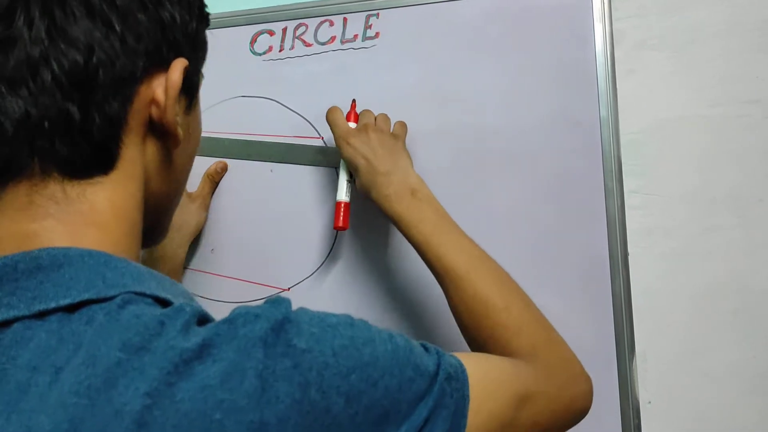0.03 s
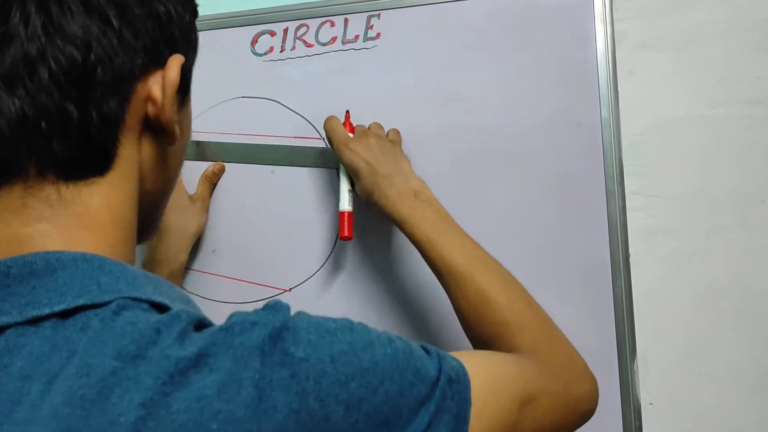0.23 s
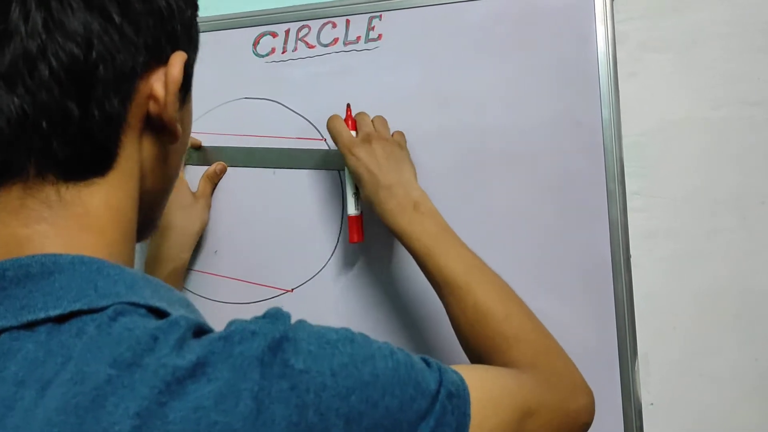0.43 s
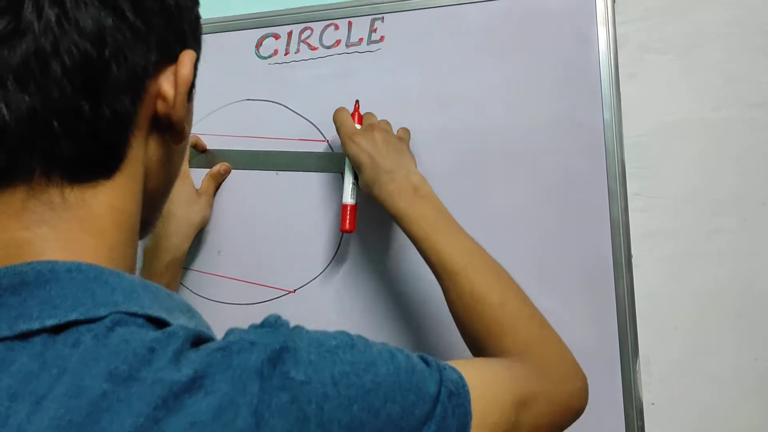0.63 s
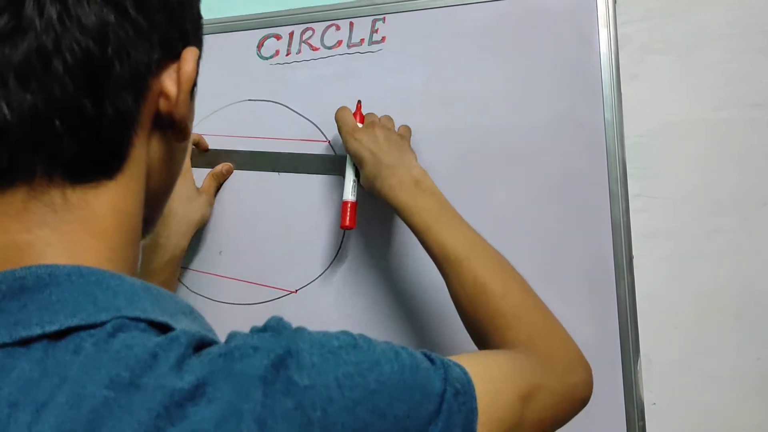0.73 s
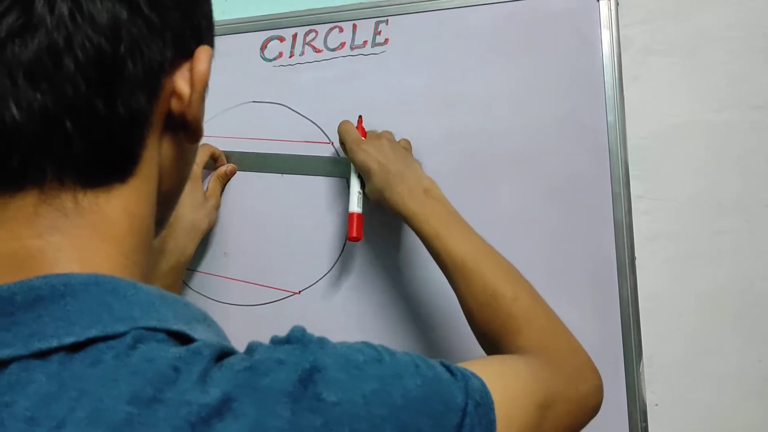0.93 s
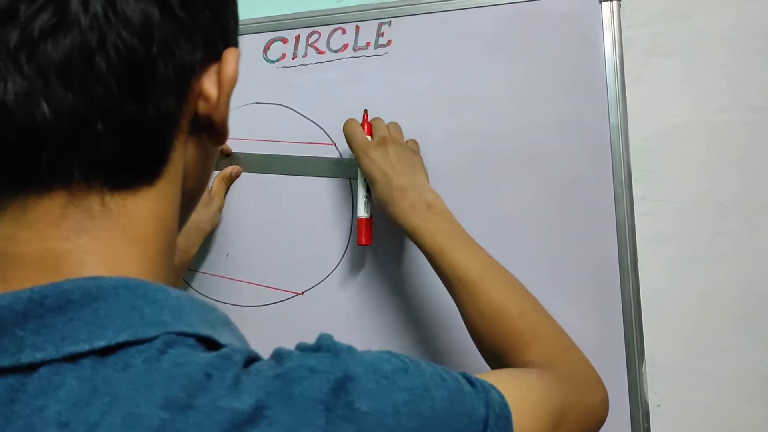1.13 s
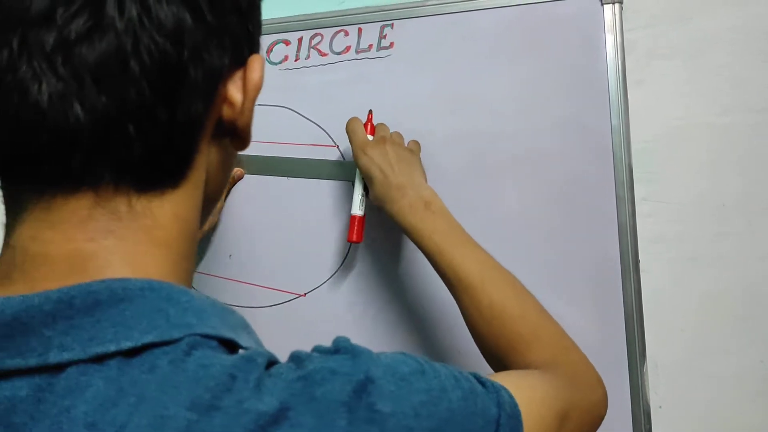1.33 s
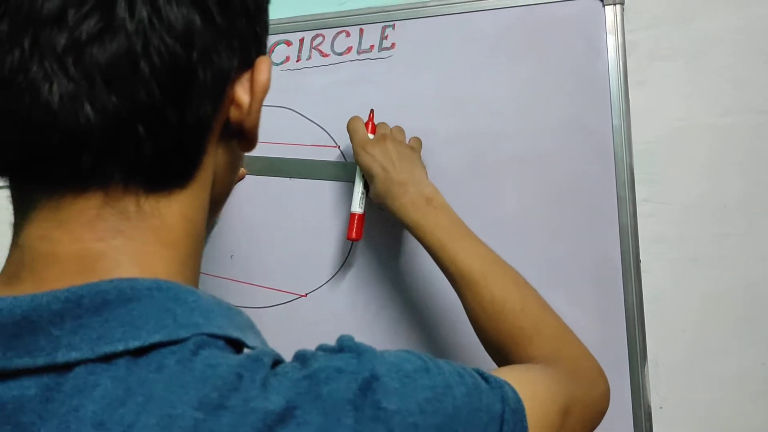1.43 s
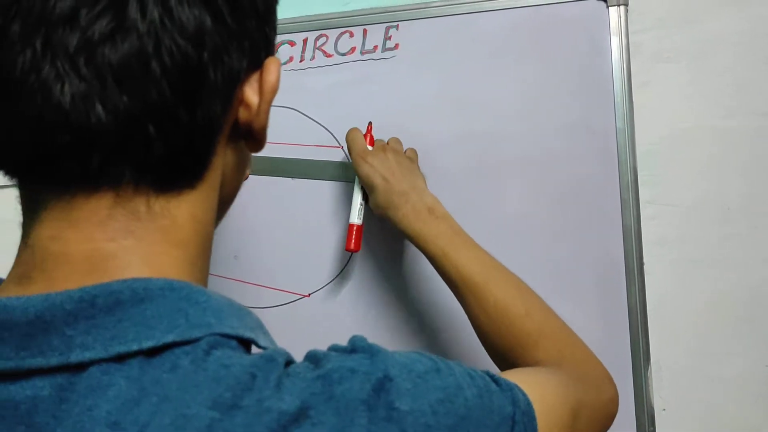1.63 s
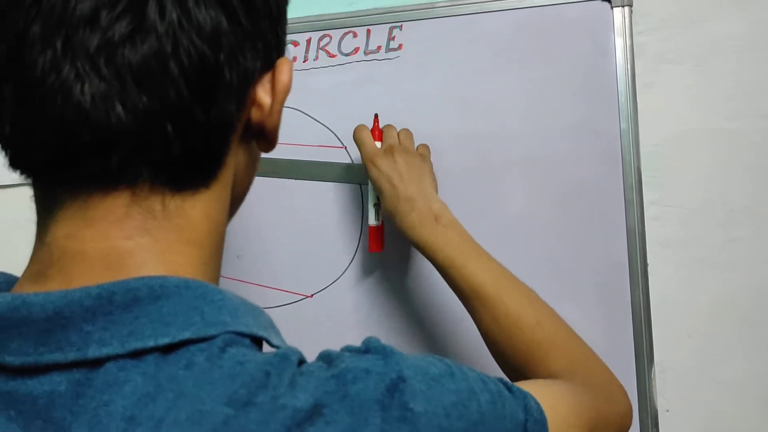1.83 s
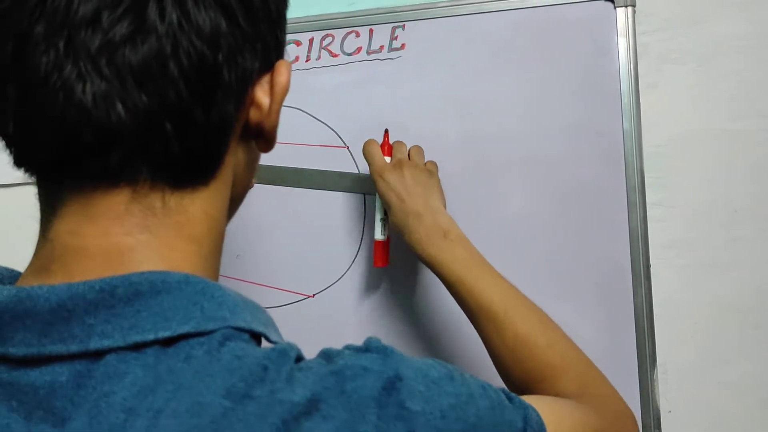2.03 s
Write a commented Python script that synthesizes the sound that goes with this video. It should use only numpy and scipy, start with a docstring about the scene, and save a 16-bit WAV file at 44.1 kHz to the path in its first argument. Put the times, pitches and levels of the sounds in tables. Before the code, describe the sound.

A ruler slips briefly and clicks against a hanging whiteboard at about 0.25 seconds, making a sharp, hollow knock. Faint taps follow, then a second, slightly softer knock comes at 0.9 seconds. Fingers and a marker add light ticks and small rubs from 1 second until about 2.1 seconds. The small room gives a short echo, with a low rumble and hiss underneath.

```python
"""A small, quiet room: a ruler and a marker are shifted on a hanging whiteboard.
Twice the ruler slides, clicks down and knocks the board, which flexes and rings low and hollow;
fingers and marker add faint taps and rubs. The walls answer briefly over a low rumble and hiss."""
import sys
import numpy as np
from scipy import signal
from scipy.fft import rfft, irfft
from scipy.io import wavfile

SR = 44100
rng = np.random.default_rng(int(sys.argv[2]) if len(sys.argv) > 2 else 0)


def digitize_waveform(pressure):
    """Quantize a signal to 16-bit integers and store it at the path in sys.argv[1].

    Rows of a 2-D input are taken as channels; values are limited to [-1, 1].
    """
    field = np.atleast_2d(pressure).T
    bounded = np.clip(field, -1, 1)
    quanta = np.round(bounded * 32767).astype(np.int16)
    wavfile.write(sys.argv[1], SR, quanta)


N = 92610
T = np.arange(N) / SR
FREQS = np.maximum(np.fft.rfftfreq(N, 1 / SR), 1)

# Spectrum of the board's dense, damped modes. Each row: frequency in Hz, relative density in dB.
CLACK_SPECTRUM = [(90, -65.5), (150, -39.5), (240, -18.5), (400, -16), (750, 3), (1000, -2.5), (1330, -2),
                  (1650, -9.5), (2100, -14.5), (2800, -20.5), (5000, -31), (9000, -27.5), (15000, -71.5)]
# Spectrum of ticks and sliding hiss. Each row: frequency in Hz, relative density in dB.
CLICK_SPECTRUM = [(200, -65), (1000, -28.5), (2500, -26.5), (4000, -16), (5300, -11.5), (7000, -1),
                  (8800, -5), (10500, -10.5), (12000, -16.5), (15500, -17)]


def board_knocks():
    """Each blow flexes the board for a few cycles, rings its modes and gives a woody clack."""
    # Each row: start in seconds, flex level in dB, flex pitch in Hz, push length in seconds,
    # ring gain in dB, clack level in dB, clack tilt in dB per octave.
    blows = [(0.211, -38, 532, .012, -58, -55, 4), (.2462, -8.5, 510.4, 0.022, -19.5, -17, 1),
             (0.47, -45.5, 502, 0.0097, -52.5, -48.5, 4.5), (0.533, -47.5, 503, 0.018, -63, -62, 6),
             (0.663, -36, 523, 0.023, -58, -58, 5.5), (.773, -54, 602, 0.018, -58, -59, 4.5),
             (0.885, -35, 546, 0.019, -46.5, -45, 1), (.9113, -14.5, 601, 0.0117, -27.5, -21, -5.5),
             (.9135, -42.5, 253.4, 0.015, -51, -46, 3), (1.029, -44, 563, 0.0051, -54, -52, 4),
             (1.197, -44, 560, 0.0093, -54, -54.5, 4.5), (1.393, -40.5, 496, 0.019, -62, -69, 9),
             (1.5186, -54, 1102, 0.025, -46.5, -52, 4), (1.596, -48, 573, 0.014, -50, -49, 1.5),
             (1.635, -41, 508, 0.024, -51.5, -49.5, 0.5), (1.703, -57.5, 500, .022, -63, -63, 6),
             (1.8267, -44, 523, 0.0081, -78, -56, 2)]
    # Each row: frequency in Hz, relative level in dB, T60 in seconds.
    board_modes = [(324.6, -5.5, 0.15), (478.7, -7.5, 0.14), (523.1, -3.5, 0.25), (648.2, 10.5, 0.12),
                   (764, -10, 0.24), (874, -4.5, 0.17), (980, -52, 0.13), (1120, 3, 0.11),
                   (1374, -9.5, 0.1), (1450, -6.5, 0.099), (1985, -18, .16), (2350, -14, 0.078)]
    boost_db, boost_octaves, ring_trim_db = 7, 0.26, -4
    echo_s, echo_db = 0.017, -8
    modes = [(hz, from_db(db) * decay(t60_s) * attack(0.0065) * np.sin(2 * np.pi * hz * T))
             for hz, db, t60_s in board_modes]
    clack_envelope = attack(0.0021) * decay(t60_s=0.12)
    noise = stereo_noise()
    flexes, rings, clacks = np.zeros(N), np.zeros(N), np.zeros((2, N))
    for start_s, flex_db, flex_hz, push_s, ring_db, clack_db, tilt_db in blows:
        push = np.sin(np.pi * np.minimum(T / push_s, 1)) ** 2
        flexes += from_db(flex_db) * delayed(push * np.sin(2 * np.pi * flex_hz * T), start_s)
        ring = 0
        for hz, mode in modes:   # modes near the flex pitch ring more
            nearness = np.exp(-(np.log2(hz / flex_hz) / boost_octaves) ** 2)
            ring += from_db(boost_db * nearness) * mode
        rings += from_db(ring_db + ring_trim_db) * delayed(ring, start_s)
        clack_noise = coloured(noise, CLACK_SPECTRUM, tilt_db)
        clacks += from_db(clack_db) * delayed(clack_envelope, start_s) * clack_noise
    wall_echo = from_db(echo_db) * delayed(flexes, echo_s)
    return flexes + wall_echo + rings + clacks


def edge_ticks():
    """Hard edges meet the surface in short broadband cracks."""
    # Each row: start in seconds, strength in dB, treble corner in Hz.
    contacts = [(.2377, -10.5, 15000), (.2452, -2.5, 7500), (.2486, -3.5, 13400), (0.2517, -19, 14000),
                (0.2564, -31, 10000), (.4712, -20.5, 6100), (.8988, -21, 8500), (.907, -10, 8500),
                (.910, -13.5, 8500), (.9232, -25, 8500), (1.029, -28.5, 8200), (1.1966, -21, 7360),
                (1.514, -30, 9000), (1.5165, -44, 9700), (1.594, -49, 8600), (2.081, -33, 9500)]
    cracks = 0
    for start_s, db, top_hz in contacts:
        burst = rfft(decay(t60_s=0.0038) * rng.standard_normal(N))
        crack = irfft(burst / (np.abs(burst) + 1e-9), N)   # flat spectrum
        cracks += from_db(db) * dulled(delayed(crack, start_s), top_hz)
    return coloured(cracks, CLICK_SPECTRUM)


def ruler_slides():
    """Tiny slips under the ruler hiss, rasp and make the board's main resonance drone."""
    # Each row: start in seconds, length in seconds, then hiss, rasp and drone gains in dB.
    strokes = [(-.02, 0.048, -92, -63.5, -48.5), (.216, .030, -44.5, -53.5, -31.5),
               (0.235, 0.018, -65, -28.5, -24), (0.883, 0.036, -43.5, -44, -32),
               (0.904, 0.025, -46.5, -33.5, -31.5), (1.508, 0.029, -56, -49.5, -43.5),
               (1.581, 0.058, -64, -57.5, -57), (1.756, .07, -72, -62, -50.5),
               (2.009, 0.14, -76, -65.5, -55)]
    slips_per_s, spread_db = 1800, 6
    drone_hz, half_width_hz = 520, 73
    slips = (rng.random(N) < slips_per_s / SR) * rng.choice([-1, 1], N)
    slips = slips * from_db(spread_db * rng.standard_normal(N))
    slips /= slips.std()
    resonance = irfft(rfft(slips) / (1 + ((FREQS - drone_hz) / half_width_hz) ** 2), N)
    power = np.abs(signal.hilbert(resonance)) ** 2
    drone = resonance * np.sqrt(2 / (power + power.mean()))   # evens out the level
    gains = np.zeros((3, N))
    for start_s, length_s, *gains_db in strokes:
        swell = np.sin(np.pi * np.clip((T - start_s) / length_s, 0, 1))
        gains += np.outer(from_db(gains_db), swell)
    hiss_gain, rasp_gain, drone_gain = gains
    hiss = dulled(coloured(slips * hiss_gain, CLICK_SPECTRUM), top_hz=10000)
    rub = coloured(slips * rasp_gain, CLACK_SPECTRUM) + drone_gain * drone
    return hiss, rub


def early_reflections(x, level_db=-4.5):
    """Scatter off the board, arm and shoulder."""
    tail = decay(t60_s=0.063)
    response = stereo_noise() * tail / np.linalg.norm(tail)
    return from_db(level_db) * signal.fftconvolve(x[None], response, axes=1)[:, :N]


def room_reverb(x):
    """Diffuse reverberation, dying at its own rate in each octave."""
    # Each row: frequency in Hz, T60 in seconds.
    decay_times = [(200, 0.29), (550, 0.28), (1300, 0.33), (3000, 0.28), (7500, 0.18), (12000, 0.63)]
    # Each row: frequency in Hz, reverberation level in dB.
    band_levels = [(200, -2), (550, -12.5), (1300, -6.5), (3000, -3.5), (7500, 4), (12000, -28)]
    noise_spectrum, response = rfft(stereo_noise()), 0
    centres_hz = 125 * 2. ** np.arange(8)
    for hz, weights in zip(centres_hz, np.eye(len(centres_hz))):
        tail = attack(0.0013) * decay(at_hz(decay_times, hz))
        band = irfft(noise_spectrum * np.interp(np.log(FREQS), np.log(centres_hz), weights), N)
        response += from_db(at_hz(band_levels, hz)) * band * tail / np.linalg.norm(tail)
    return signal.fftconvolve(x[None], response, axes=1)[:, :N]


def background():
    """Low room rumble, hiss and a faint hum."""
    # Each row: frequency in Hz, relative density in dB.
    floor_spectrum = [(20, -4), (35, -18), (60, 2.5), (80, -10.5), (118, -14), (155, -5), (230, -6.5),
                      (350, -12), (550, -15), (900, -20), (1600, -26), (3000, -31), (5200, -33.5),
                      (7500, -26), (9200, -32.5), (10300, -45.5), (14000, -47), (15200, -78)]
    floor_db, hum_hz, hum_db = -55.5, 66.9, -65.5
    hum = from_db(hum_db) * np.sqrt(2) * np.sin(2 * np.pi * hum_hz * T)
    return from_db(floor_db) * coloured(stereo_noise(), floor_spectrum) + hum


def stereo_noise():
    """White noise, alike on both sides in the bass, unrelated in the treble."""
    # Each row: frequency in Hz, left-right correlation.
    correlation = [(60, 0.91), (500, 0.72), (1300, 0), (2500, 0.073), (6000, 0), (14000, 0)]
    mid, side = rfft(rng.standard_normal((2, N)))
    alike = at_hz(correlation, FREQS)
    return irfft(np.sqrt((1 + alike) / 2) * mid + np.sqrt((1 - alike) / 2) * side * [[1], [-1]], N)


def coloured(x, spectrum, tilt_db=0):
    """Filter by a spectrum tilted per octave; white input keeps its power."""
    gain = from_db(at_hz(spectrum, FREQS) + tilt_db * np.log2(np.maximum(FREQS, 150)))
    return irfft(rfft(x) * gain / np.sqrt(np.mean(gain ** 2)), N)


def dulled(x, top_hz):
    """Low-pass, 22 dB per octave."""
    return irfft(rfft(x) / np.sqrt(1 + (FREQS / top_hz) ** 7.3), N)


def from_db(db):
    """Decibels to gain."""
    return 10 ** (np.asarray(db) / 20)


def at_hz(points, hz):
    """Table lookup on a log-frequency axis."""
    points_hz, values = np.transpose(points)
    return np.interp(np.log(hz), np.log(points_hz), values)


def decay(t60_s):
    """Exponential fall from 1."""
    return np.exp(-np.log(1000) * T / t60_s)


def attack(rise_s):
    """Soft rise from 0 to 1."""
    return 1 - np.exp(-T / rise_s)


def delayed(x, delay_s):
    """Shift x later, keeping its length."""
    shifted, offset = np.zeros_like(x), int(np.clip(delay_s * SR, 0, N - 1))
    shifted[..., offset:] = x[..., :N - offset]
    return shifted


def scene():
    """Board, ruler and room together."""
    hiss, rub = ruler_slides()
    bright = edge_ticks() + hiss
    body = board_knocks() + rub
    reflections = early_reflections(bright) + room_reverb(body.mean(axis=0) + bright)
    return body + bright + dulled(reflections, top_hz=10100) + background()


def record(dry):
    """Two microphones, each with its own colour, the left slightly late; the top is cut."""
    # Microphone responses. Each row: frequency in Hz, gain in dB.
    left_mic = [(100, 6.5), (600, 3.64), (1300, 2.17), (2200, 1.5), (4500, -1.5), (6800, -7.5), (8800, 6.5),
                (10300, -0.5), (15000, 2)]
    right_mic = [(100, 2), (600, -0.97), (1300, 0), (2200, 2), (4500, 1), (7100, 2), (8600, 0),
                 (10300, -6.5), (15000, 1)]
    left_lag_s, cutoff_hz = 0.00006, 15900
    left = from_db(at_hz(left_mic, FREQS)) * np.exp(-2j * np.pi * FREQS * left_lag_s)
    right = from_db(at_hz(right_mic, FREQS))
    heard = irfft(rfft(dry) * np.array([left, right]), N)
    return signal.sosfilt(signal.ellip(10, .1, 80, cutoff_hz, fs=SR, output="sos"), heard)


dry = scene()
out = record(dry)
digitize_waveform(out)
```